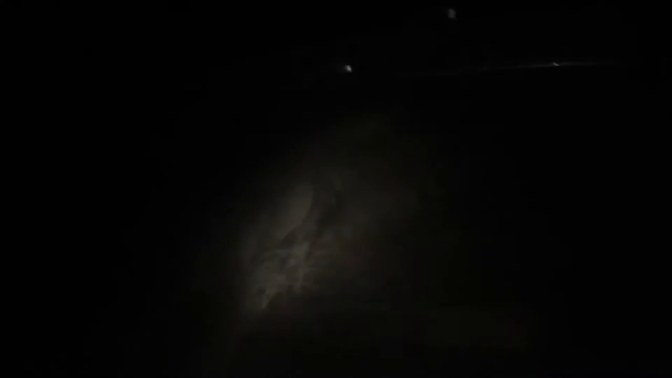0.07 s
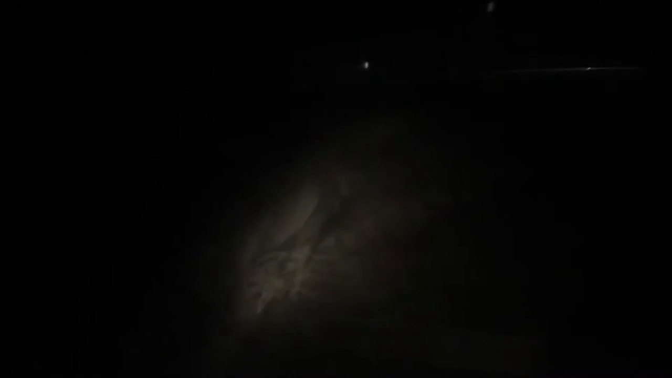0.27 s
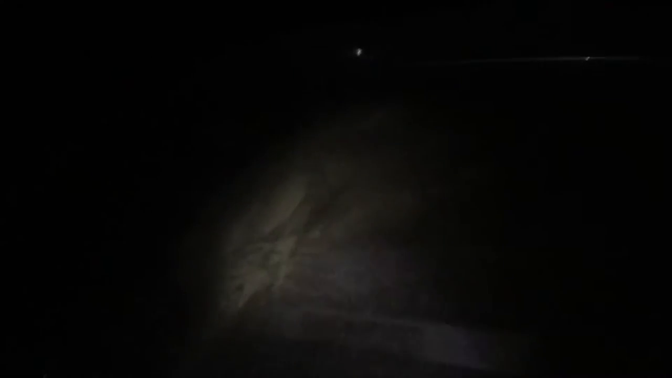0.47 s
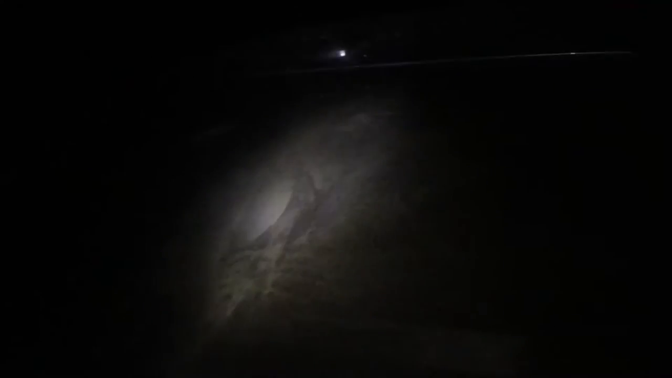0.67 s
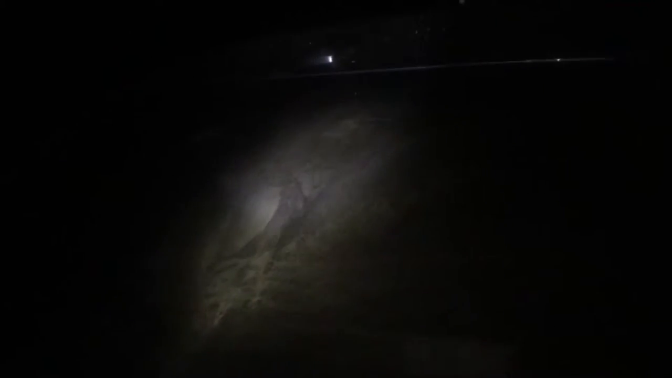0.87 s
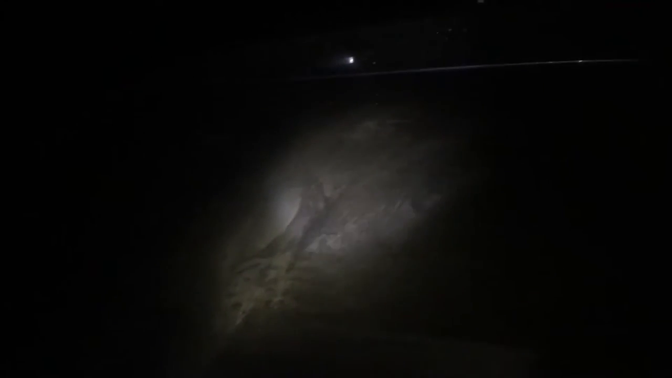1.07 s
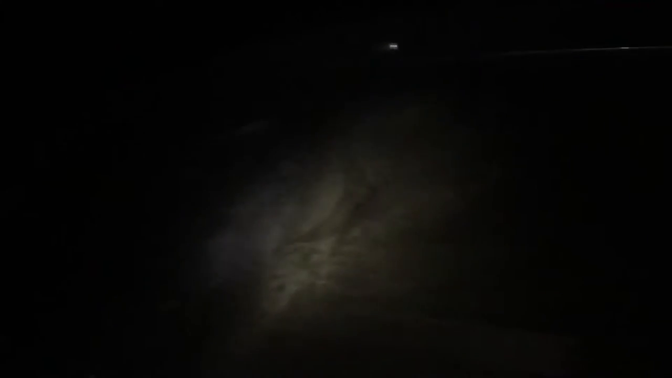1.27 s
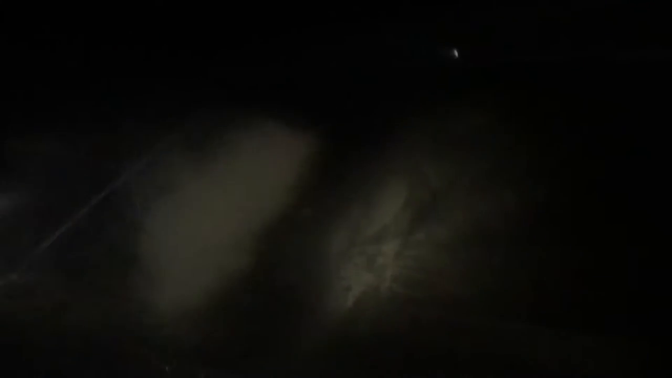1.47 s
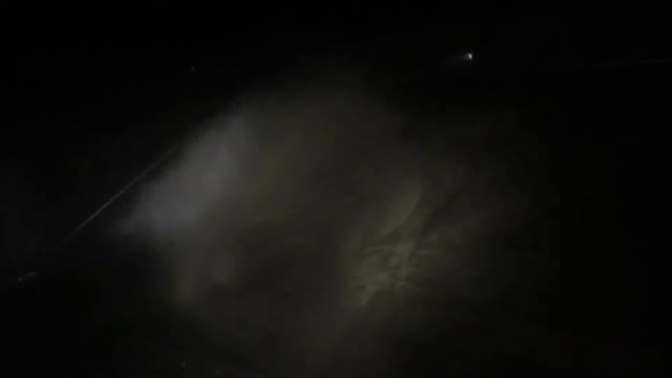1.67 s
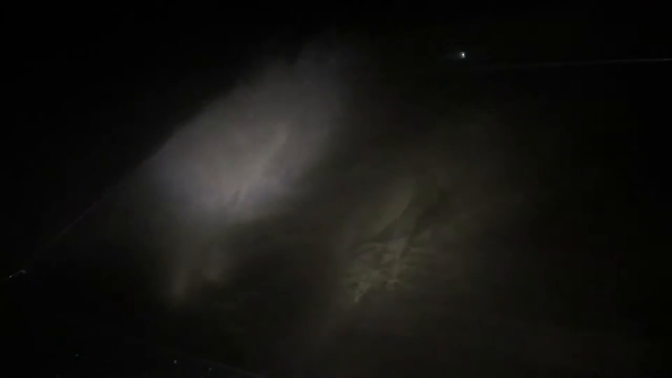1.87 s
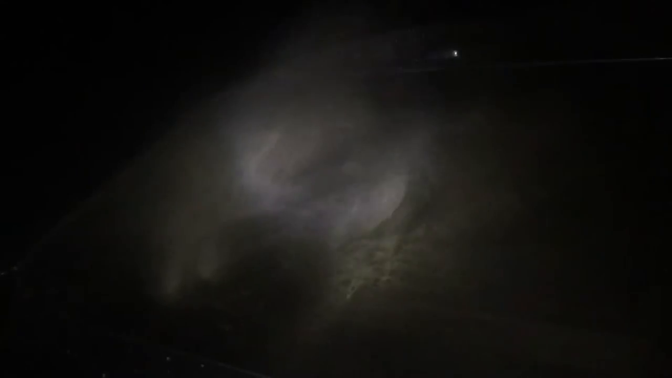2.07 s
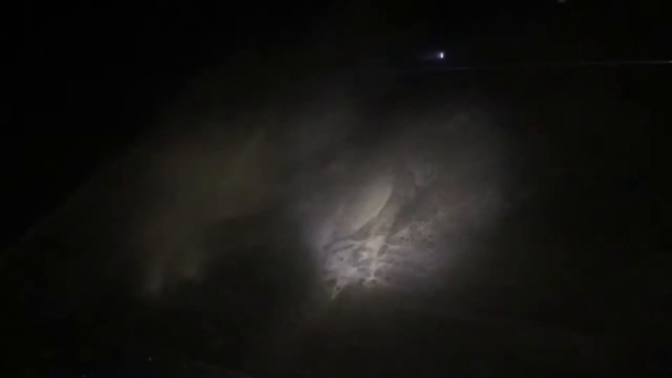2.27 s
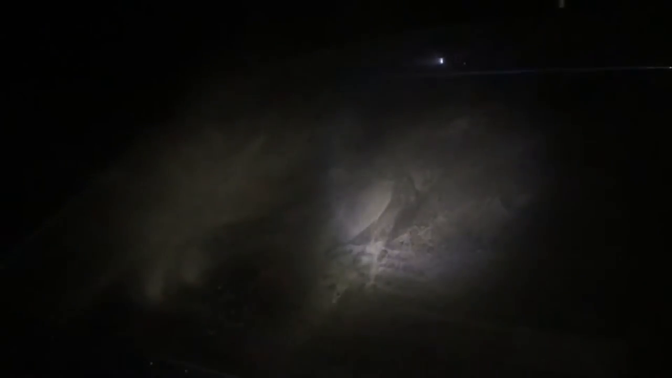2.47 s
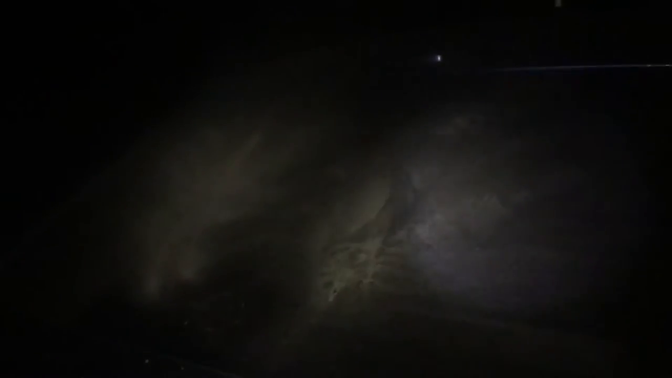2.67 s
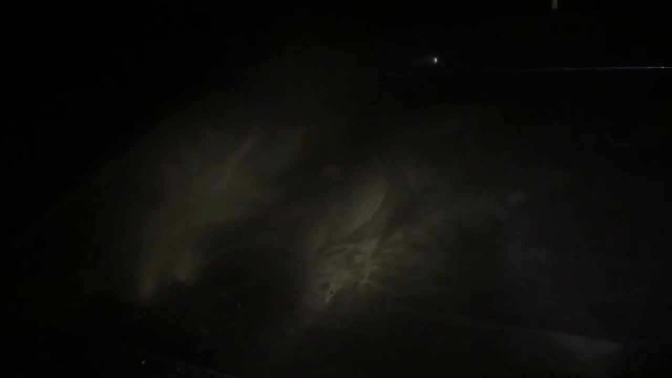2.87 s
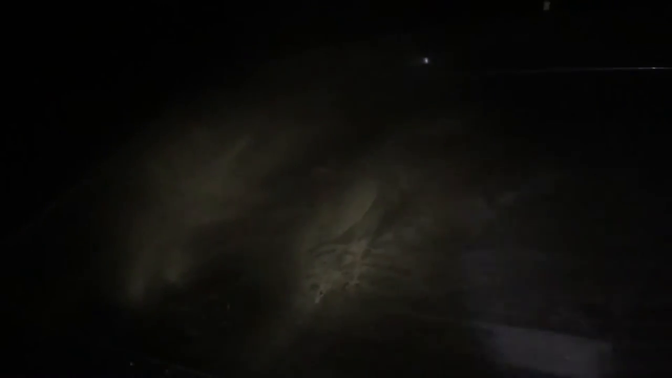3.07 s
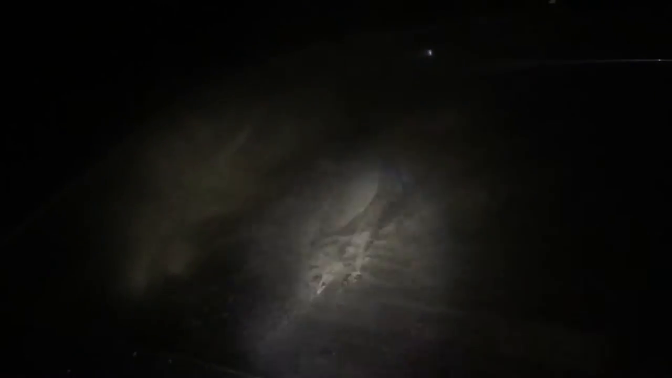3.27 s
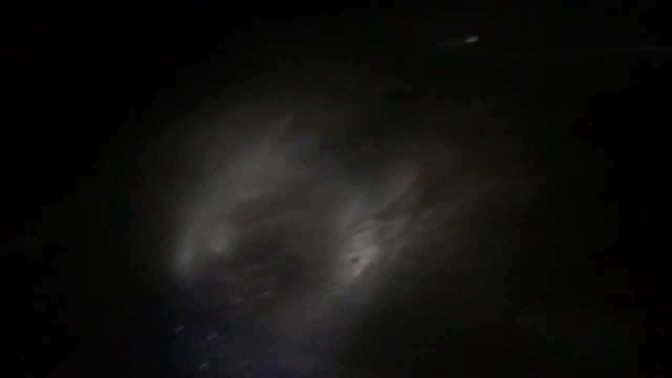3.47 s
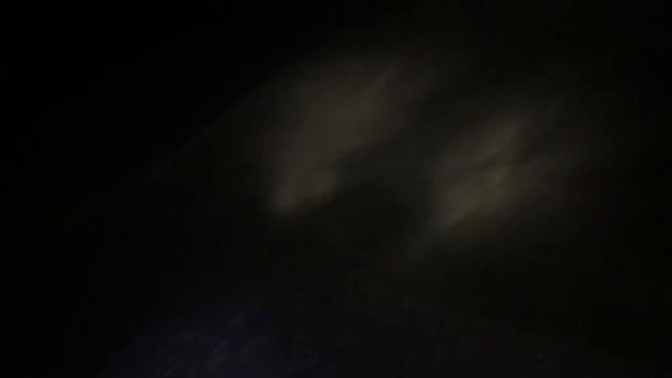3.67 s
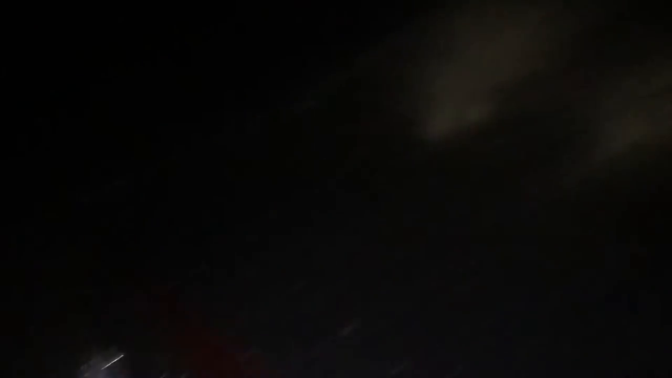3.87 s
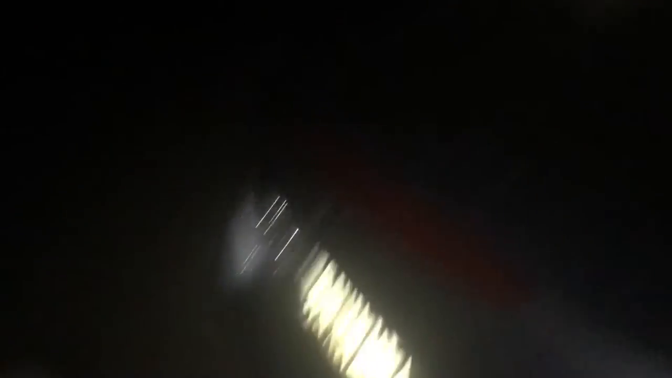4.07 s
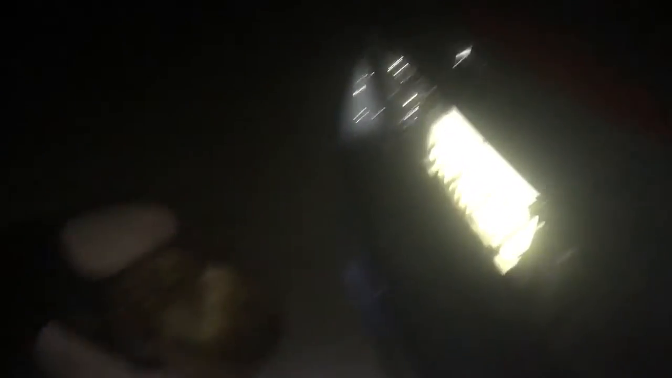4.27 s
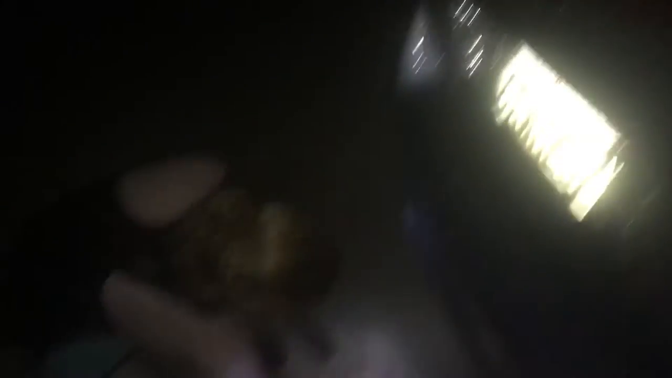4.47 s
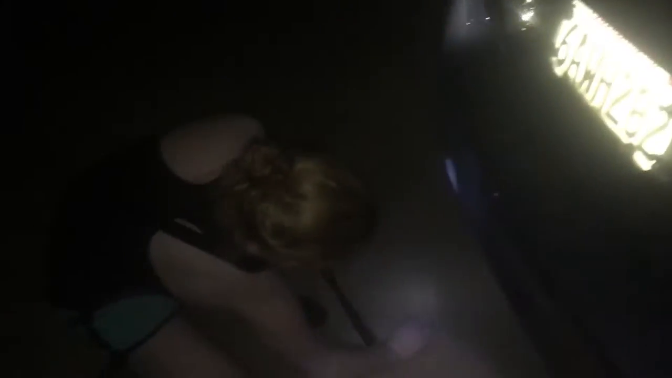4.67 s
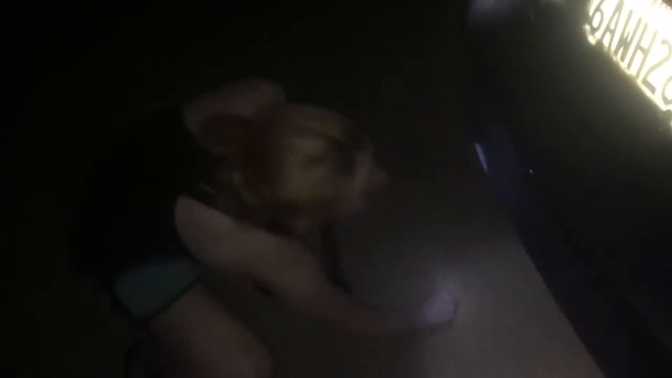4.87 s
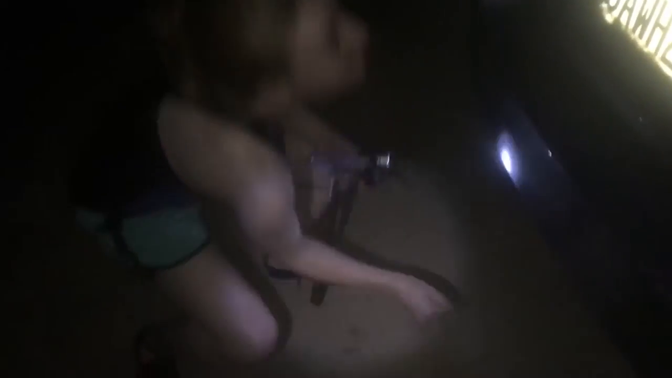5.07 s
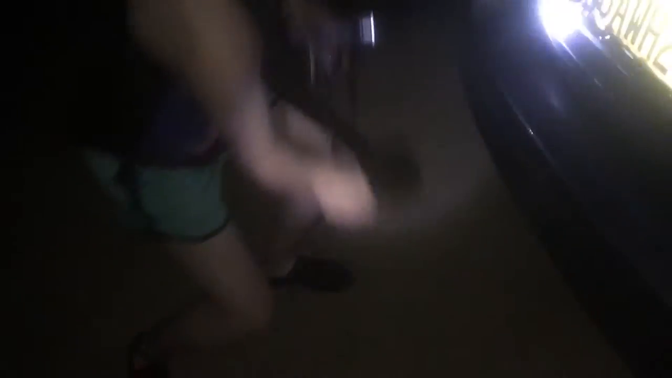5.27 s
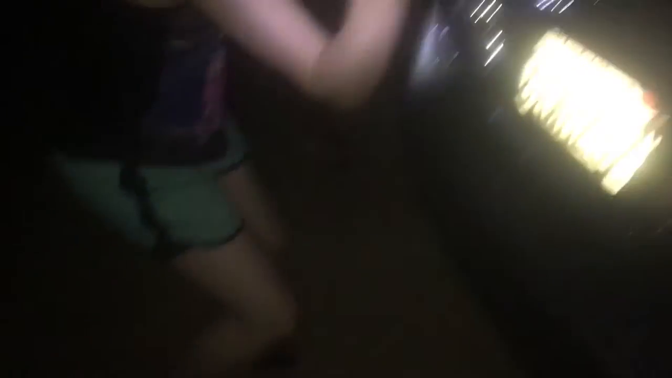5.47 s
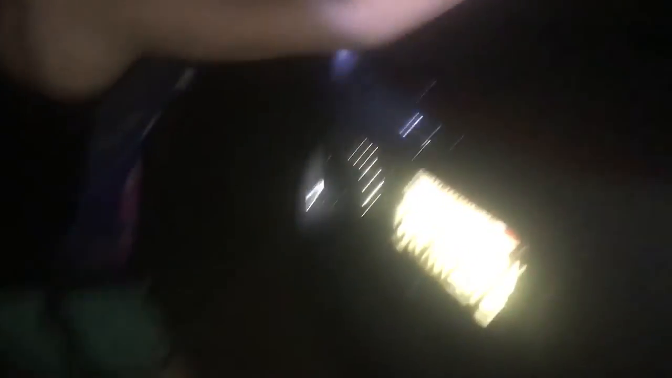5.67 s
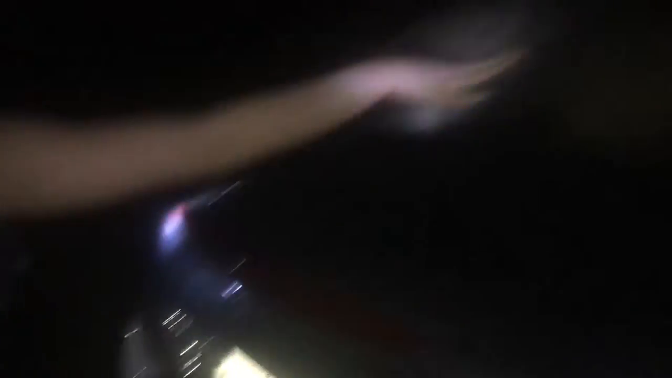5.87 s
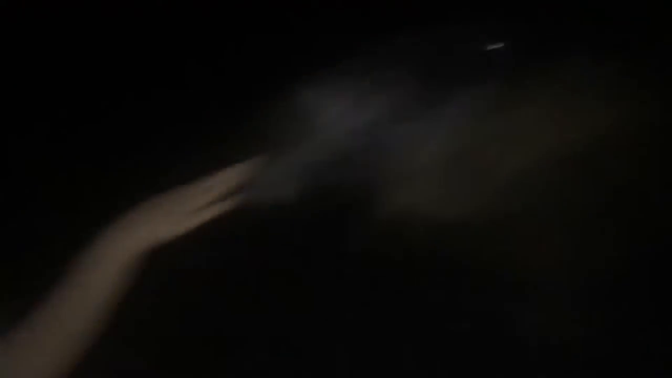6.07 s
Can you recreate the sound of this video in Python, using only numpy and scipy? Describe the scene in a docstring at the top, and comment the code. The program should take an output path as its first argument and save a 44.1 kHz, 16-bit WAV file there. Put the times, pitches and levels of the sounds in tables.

```python
"""A camera creaks in the grip and shoes scuff gritty ground, over the low hum of a quiet night.
Then a handful of dry dirt hits a car: grit sprays on the bodywork, the panel thuds under its weight,
pebbles tick, and sand slides off and sprinkles on the ground. A hand rakes up more dirt, the feet shift,
and a second handful lands. The dirt is clouds of tiny noise bursts, the thud is noise ringing the
panel's modes, and the creaks are damped clicks of the slipping case."""
import sys
import numpy as np
from scipy import signal
from scipy.fft import rfft, irfft
from scipy.io import wavfile
from scipy.ndimage import map_coordinates

SR = 44100
rng = np.random.default_rng(int(sys.argv[2]) if len(sys.argv) > 2 else 0)


def transcribe(signal):
    """Save signal, clipped to [-1, 1], as a 16-bit WAV file at the path in sys.argv[1]."""
    frames = np.atleast_2d(signal).T
    limited = np.clip(frames, -1, 1)
    pcm = np.round(limited * 32767).astype(np.int16)
    wavfile.write(sys.argv[1], SR, pcm)


N = 269451

# The EQ curve of each noise layer. Each row: frequency in Hz, relative level in dB.
AIR_EQ = [(25, -28.5), (45, -2.5), (85, -2.5), (130, -9), (180, -19.5), (300, -18), (500, -25.5),
          (2500, -29), (7000, -35), (16000, -44)]
RUSTLE_EQ = [(120, -14), (230, -4.5), (600, -5), (1150, -0.5), (2300, 1), (3200, -6), (6000, -10),
             (16000, -20.5)]
SCRAPE_EQ = [(150, -22), (350, -3), (1000, -8.5), (1700, -11), (2300, -1.5), (3000, -5.5), (4800, -6),
             (8500, -9), (12500, -11.5), (16000, -23)]
SCUFF_EQ = [(170, -15), (300, -6.5), (600, -6.5), (1150, -1.5), (2100, -3), (4000, -8), (8000, -14.5),
            (16000, -24)]
LANDING_EQ = [(120, -11.5), (270, -3), (500, -5.5), (1100, -0.5), (2200, 0.5), (3200, -2), (6000, -12.5),
              (11000, -12.5), (16000, -20)]
SLIDE_EQ = [(1000, -37.5), (2800, -8.5), (4200, -4.5), (5500, -7.5), (9000, -3), (10500, -4), (16000, -10)]
SPRAY_EQ = [(200, -23.5), (600, -11.5), (1300, -7), (2700, -10.5), (3600, -6), (5700, 2.5), (9000, -2.5),
            (10500, -2), (16000, -15)]
# The tones of the low hum. Each row: pitch in Hz, rms level in dB.
HUM_TONES = [(55, -66), (113, -74.5), (242, -79.5)]
# The loudest creaks of the camera's case. Each row: start in seconds, peak in dB before trim, ring in Hz.
CASE_CREAKS = [(0.014, -33, 1300), (0.019, -25.5, 1220), (.0232, -25.5, 1270), (0.026, -25.5, 1220),
               (.0517, -29.5, 1250), (.501, -30, 1600), (.505, -29.5, 2100), (.7, -36, 1760),
               (.719, -29, 2000), (.739, -23, 2260), (.755, -26, 2080), (.787, -30, 1620), (.81, -31, 1700),
               (.886, -39, 3000), (.95, -31.5, 2190), (1.307, -20.5, 1490), (1.3259, -24, 1324),
               (3.98, -27.5, 1240), (5.03, -45.5, 1210), (5.297, -23, 1944), (5.3264, -29.5, 1755),
               (5.781, -27, 1070)]
# Soft knocks on the camera. Each row: start in seconds, peak in dB before trim, pitch in Hz.
CASE_KNOCKS = [(1.016, -54.5, 444), (2.448, -49, 51), (2.561, -43, 55), (3.101, -38, 80.6),
               (3.97, -53, 59.7), (4.051, -47, 65)]
# Feet shifting slowly in the dirt. Each row: start in seconds, length in seconds, level in dB.
FOOT_SHUFFLES = [(-.1, 0.4, -59), (0.237, .22, -58.5), (0.411, 0.28, -61.5), (0.799, 0.2, -67.5),
                 (1.168, .27, -62), (3.47, 0.26, -55), (4.738, 0.3, -61), (5.211, 1, -66.5)]
# A hand raking up dirt. Each row: start in seconds, length in seconds, level in dB.
HAND_RAKES = [(3.693, 0.43, -58), (4.058, .45, -52.5), (4.463, 0.43, -55.5)]
# Short scuffs on grit. Each row: start and length in seconds, level in dB, tilt in dB per octave.
SHOE_SCUFFS = [(.008, 0.051, -48.5, -3), (0.49, 0.027, -51, -2), (0.703, .12, -47, 0),
               (0.882, 0.152, -60, 2.5), (1.179, 0.057, -49.5, -2), (1.221, 0.044, -47.5, -1.5),
               (3.246, 0.036, -49.5, -5), (3.85, 0.025, -51.5, -4), (3.943, 0.089, -49.5, -2),
               (4.1, 0.082, -53, -1.5), (5.056, 0.069, -60, 3), (5.247, 0.13, -55.5, 1),
               (5.37, 0.072, -47.5, 1), (5.562, 0.055, -56.5, -1), (5.696, 0.14, -52, -.5)]
# Sand running down the car. Each row: start in seconds, level in dB before trim, sag in dB per second,
# hold in seconds, 60 dB decay in seconds, landing rustle in dB relative to the level.
SAND_SLIDES = [(1.546, -39, 7, 1.22, 4.1, -10.5), (5.848, -36.5, 44, .3, 1.5, -9.5)]
# The largest pebbles on the bodywork. Each row: start in seconds, peak in dB, ring in Hz.
PEBBLE_HITS = [(1.471, -11, 8540), (1.4916, -28, 7200), (1.503, -17, 6300), (1.614, -20.5, 5830),
               (1.668, -24, 5600), (1.8235, -18, 6260), (2.3038, -26.5, 5200), (2.376, -29, 5330),
               (2.545, -26, 5030), (2.7038, -33, 7000), (2.7162, -29, 6400), (2.927, -32, 7800),
               (3.074, -40, 4060), (3.2553, -32.5, 2640), (3.3247, -33, 4600), (3.404, -37, 6800),
               (5.8452, -5, 6050), (5.913, -14.5, 5130), (5.9714, -19, 5100), (6.0054, -26, 2200),
               (6.052, -26.5, 1770), (6.0724, -19, 5570), (6.0851, -17, 5230)]
# The modes of the body panel. Each row: frequency in Hz, base width in Hz, gain in dB.
PANEL_MODES = [(58, 37, -2.5), (86.4, 24, 0.5), (106.6, 17, 2.5), (251, 38, -4), (328.5, 54, -3)]
# Dirt hitting the car, the second handful in two bursts. Each row: start in seconds, level in dB,
# rise, hold and 60 dB decay in seconds, thud in dB relative to the spray, tilt in dB per octave,
# pitch of the grit as a ratio.
DIRT_BURSTS = [(1.444, -23.5, 0.029, 0.044, 0.24, -18, 0.73, 0.96),
               (5.8395, -22, 0.0079, 0.004, 0.052, -7, -.8, 0.62),
               (5.847, -28.5, 0.0034, 0.012, 0.44, -12.5, -.7, 0.81)]
# Early reflections off ground and bodywork. Each row: delay in seconds, gain in dB.
REFLECTIONS = [(.0019, -30.5), (.0031, -21), (.0052, -29.5), (.0083, -23.5), (0.0124, -19.5)]
# The microphone port's resonances. Each row: frequency in Hz, width in Hz, added gain as a factor.
PORT_BANDS = [(1140, 150, 0.0052), (2280, 250, 0.11), (2810, 340, -0.18), (10530, 610, -0.58)]


def amp(db):
    """Decibels to gain."""
    return 10 ** (np.asarray(db) / 20)


def unit(x):
    """Scale to rms 1."""
    return x / np.sqrt(np.mean(x ** 2) + 1e-20)


def clock():
    """The time of every sample, in seconds."""
    return np.arange(N) / SR


def wobble(rate):
    """A smooth random curve with rate knots a second."""
    return map_coordinates(rng.standard_normal(int(N * rate / SR) + 4), [clock() * rate])


def add(track, s, sound):
    """Mix a sound into the track at s seconds."""
    start = max(round(s * SR), 0)
    track[start:start + len(sound)] += sound[:max(N - start, 0)]


def colour(x, points, tilt_db=0, size=8192):
    """Minimum-phase EQ through (Hz, dB) points, tilted per octave."""
    octave = np.log2(np.fft.rfftfreq(size, 1 / SR) + 1)
    hz, db = np.transpose(points)
    curve_db = np.interp(octave, np.log2(hz), db) + tilt_db * (octave - octave.mean())
    cepstrum = irfft(np.log(amp(curve_db) + 1e-6))
    cepstrum[1:size // 2] *= 2
    cepstrum[size // 2 + 1:] = 0
    return signal.fftconvolve(x, irfft(np.exp(rfft(cepstrum))))[:len(x)]


def resonate(x, hz, width_hz):
    """One damped resonance."""
    return signal.lfilter(*signal.iirpeak(min(hz, SR / 2 - 1), hz / min(width_hz, SR / 4), SR), x)


def grit(rate, spread_db, t60, dust, size=N):
    """Grains of log-normal size, each a dying noise burst, over the even hiss of fine dust."""
    hits = rng.random(size) < rate / SR
    sizes = hits * amp(spread_db * np.clip(rng.standard_normal(size), -2, 2))
    energy = signal.lfilter([1], [1, -amp(-60 / (t60 * SR)) ** 2], sizes ** 2)
    envelope = np.sqrt(energy / (energy.mean() + 1e-20) + dust ** 2)
    return unit(envelope * rng.standard_normal(size))


def stroke(length):
    """The envelope of a movement that swells and dies away."""
    return np.sin(np.linspace(0, np.pi, int(length * SR)))


def slide_flow(s, db, sag_db, hold, t60, rise_s=0.099):
    """The envelope of sand that starts to run, thins, then runs out."""
    t = clock() - s
    level_db = db - sag_db * np.clip(t, 0, hold) - 60 * np.maximum(t - hold, 0) / t60
    return np.clip(t / rise_s, 0, 1) * amp(level_db)


def scatter(s, length, rate, db, spread_db, hz, size=64):
    """Small contacts at uneven times and pitches. Each row: start in seconds, peak in dB, ring in Hz."""
    times = (np.arange(size) + rng.random(size)) / rate
    peaks_db = db + spread_db * np.clip(rng.standard_normal(size), -2, 2)
    rings_hz = hz * np.exp(0.41 * rng.standard_normal(size))
    return np.column_stack([s + times, peaks_db, rings_hz])[times < length]


def night():
    """The bed: faint steady air and a wavering low hum."""
    air = amp(-63.5) * unit(colour(rng.standard_normal(N), AIR_EQ))
    hum = sum(amp(db) * unit(np.sin(2 * np.pi * hz * clock() + 0.59 * wobble(0.93)))
              for hz, db in HUM_TONES)
    return air + hum


def camera(creak_trim_db=-3.5, knock_trim_db=1.0):
    """The case slips in the grip with dry, damped clicks, mostly as the feet move, and takes knocks."""
    out, t = np.zeros(N), np.arange(SR // 10) / SR
    slips = list(CASE_CREAKS)
    for s, length, db, _ in SHOE_SCUFFS:
        slips.extend(scatter(s, length, rate=36, db=db + 10, spread_db=5.5, hz=1540))
    for s, length, db in FOOT_SHUFFLES:
        fidgets = scatter(s, length, rate=12, db=db + 12, spread_db=5.5, hz=1540)
        slips.extend(fidgets[fidgets[:, 0] > 0])
    case_high_cut = signal.butter(4, 2940, fs=SR, output="sos")
    case_low_cut = signal.butter(2, 727, "highpass", fs=SR, output="sos")
    rubs = rng.standard_normal((160, len(t)))
    for (s, db, hz), rub in zip(slips, rubs):
        slip = signal.unit_impulse(len(t)) + amp(-21.5 - 60 * t / 0.031) * rub
        ring = signal.sosfilt(case_high_cut, resonate(slip, hz, 0.62 * hz))
        snap = amp(-24) * resonate(slip, hz=3950, width_hz=3040)
        click = signal.sosfilt(case_low_cut, ring + snap)
        add(out, s, amp(db + creak_trim_db) * click / np.abs(click).max())
    for s, db, hz in CASE_KNOCKS:
        envelope = amp(db + knock_trim_db - 60 * t / 0.055) * np.minimum(t / 0.00078, 1)
        add(out, s, envelope * np.sin(2 * np.pi * hz * t))
    return out


def shuffles_and_rakes(rake_rise_s=0.18, rake_fall_s=0.069):
    """Dirt rustles softly underfoot and hisses as fingers rake through it."""
    coarse = grit(rate=160, spread_db=4.5, t60=.007, dust=1.2)
    fine = grit(rate=450, spread_db=4.5, t60=.005, dust=1.2)
    feet, hand, t = np.zeros(N), np.zeros(N), clock()
    for s, length, db in FOOT_SHUFFLES:
        skip = max(round(-s * SR), 0)  # the first shuffle is already under way
        add(feet, s, amp(db) * stroke(length)[skip:])
    for s, length, db in HAND_RAKES:
        ramp = np.minimum((t - s) / rake_rise_s, (s + length - t) / rake_fall_s)
        hand += amp(db) * np.clip(ramp, 0, 1) ** .5
    stirring = np.hypot(feet, amp(-.5) * hand)  # the hand drags coarse dirt along too
    rustle = amp(1.1 * wobble(21.94)) * stirring * unit(colour(coarse, RUSTLE_EQ))
    scrape = amp(0.52 * wobble(18)) * hand * unit(colour(fine, SCRAPE_EQ))
    return rustle + scrape


def scuffs():
    """Each stroke of a shoe crushes a patch of grit, swelling and dying away."""
    out = np.zeros(N)
    for s, length, db, tilt_db in SHOE_SCUFFS:
        push = stroke(length)
        grains = grit(rate=700, spread_db=4.3, t60=.004, dust=.75, size=SR // 4)
        crunch = unit(colour(grains, SCUFF_EQ, tilt_db)[:len(push)])
        add(out, s, amp(db) * push * crunch)
    return out


def landing_sand(sag_share=0.14):
    """Sand drops off the car and sprinkles on the ground, sagging less than the slide above it."""
    flow = sum(slide_flow(s, db + rustle_db, sag_share * sag_db, hold, t60)
               for s, db, sag_db, hold, t60, rustle_db in SAND_SLIDES)
    grains = grit(rate=160, spread_db=4.5, t60=.007, dust=1.2)
    return amp(1.07 * wobble(12)) * flow * unit(colour(grains, LANDING_EQ))


def sliding_sand(trim_db=-2.5):
    """Sand patters down the car; the heavier the flow, the more the bodywork rings with it."""
    flow = sum(slide_flow(s, db, sag_db, hold, t60) for s, db, sag_db, hold, t60, _ in SAND_SLIDES)
    grains = grit(rate=210, spread_db=4.7, t60=.013, dust=.9)
    sand = unit(colour(grains, SLIDE_EQ))
    ring = unit(resonate(sand, hz=5540, width_hz=1240)) * flow / flow.max()
    return amp(trim_db + 0.26 * wobble(25.94)) * flow * (sand + 0.92 * ring)


def pebbles(stray_fall_db_per_s=1):
    """Stones strike the bodywork: a sharp tick, then a weaker ring. Strays tumble down with the sand."""
    out, t = np.zeros(N), np.arange(SR // 10) / SR
    stones = list(PEBBLE_HITS)
    for start, flow_db, _, hold, _, _ in SAND_SLIDES:
        strays = scatter(start, 1.4 * hold, rate=13, db=flow_db + 2.5, spread_db=0, hz=6550)
        # Late stones have less speed left, so they play softer.
        stones += [(s, db - stray_fall_db_per_s * (s - start), hz) for s, db, hz in strays]
    attack = np.minimum(t / .0007, 1)
    decay = amp(-60 * t / .018) + amp(-13 - 60 * t / .035)
    bursts = attack * decay * rng.standard_normal((160, len(t)))
    for (s, db, hz), burst in zip(stones, bursts):
        tick = resonate(resonate(burst, hz, 0.55 * hz), hz, 3 * hz)
        add(out, s, amp(db) * tick / np.abs(tick).max())
    return out


def throws():
    """A cloud of grains hits the car, holds and thins out; its weight shakes the panel."""
    out, t = np.zeros(N), np.arange(SR // 2) / SR
    for s, db, rise, hold, t60, thud_db, tilt_db, pitch in DIRT_BURSTS:
        flow = np.minimum(t / rise, 1) * amp(-60 * np.maximum(t - rise - hold, 0) / t60)
        grains = grit(rate=1800, spread_db=2.6, t60=0.0047, dust=0.61, size=len(t))
        pitched_eq = [(pitch * hz, band_db) for hz, band_db in SPRAY_EQ]
        spray = unit(colour(grains, pitched_eq, tilt_db))
        push = rng.standard_normal(len(t))
        thud = unit(sum(amp(mode_db) * resonate(resonate(push, hz, 1.5 * width), hz, 1.49 * width)
                        for hz, width, mode_db in PANEL_MODES))
        add(out, s, amp(db) * flow * (spray + amp(thud_db) * thud))
    return out


def reflect(x):
    """The ground and the car's side send back a few weak, early copies."""
    out = x.copy()
    for delay, db in REFLECTIONS:
        add(out, delay, amp(db) * x)
    return out


def scene():
    """A close mono mix in the open air; only the dirt gets reflections."""
    dirt = throws() + pebbles() + sliding_sand() + landing_sand() + shuffles_and_rakes() + scuffs()
    return (reflect(dirt) + camera() + night())[None]


def record(dry, low_cut_hz=38, high_cut_hz=15900):
    """The microphone port colours the sound, and the camera cuts the deep bass and the very top."""
    heard = dry + sum(gain * resonate(dry, hz, width) for hz, width, gain in PORT_BANDS)
    heard = signal.sosfilt(signal.butter(4, low_cut_hz, "highpass", fs=SR, output="sos"), heard)
    return signal.sosfilt(signal.ellip(12, .1, 80, high_cut_hz, fs=SR, output="sos"), heard)


dry = scene()
out = record(dry)
transcribe(out)
```